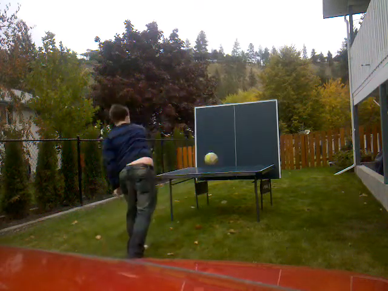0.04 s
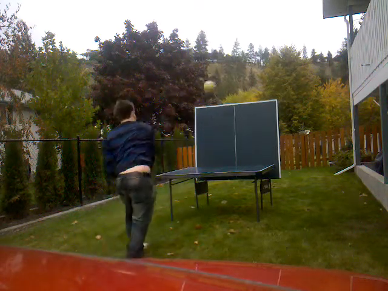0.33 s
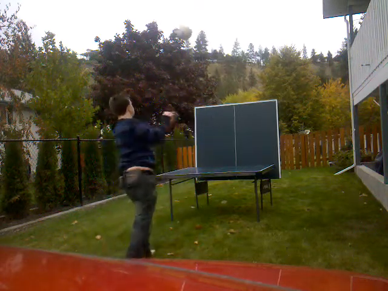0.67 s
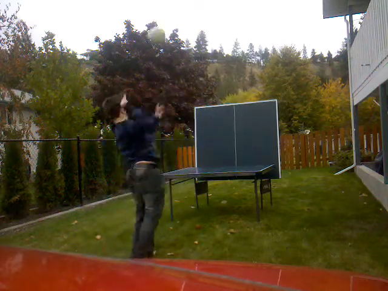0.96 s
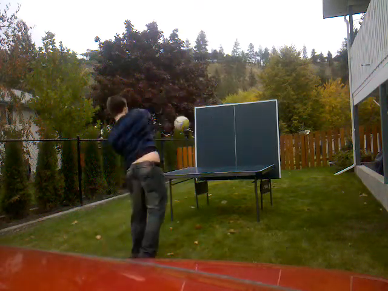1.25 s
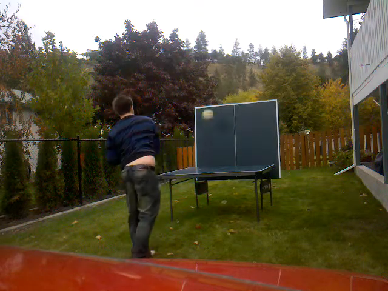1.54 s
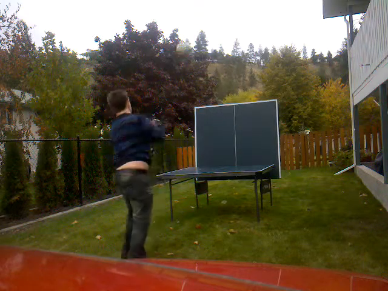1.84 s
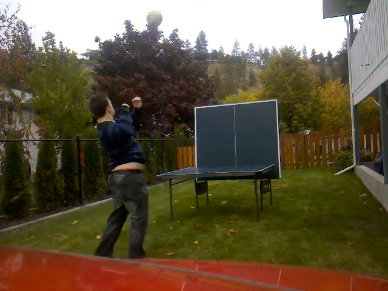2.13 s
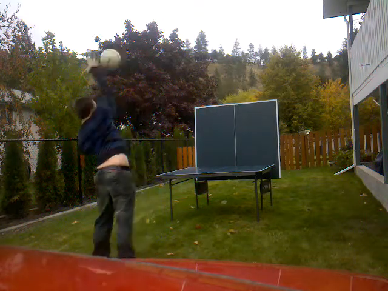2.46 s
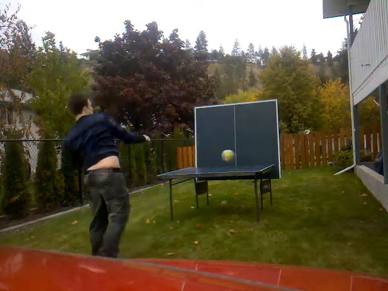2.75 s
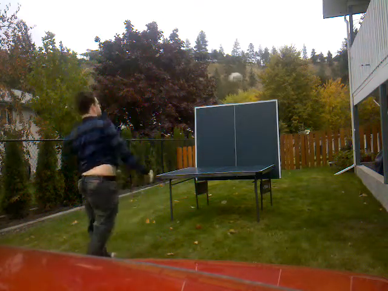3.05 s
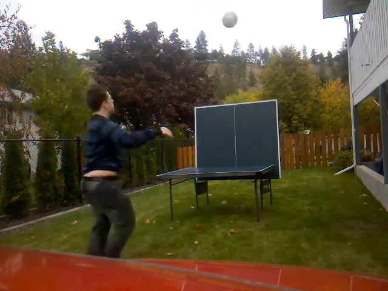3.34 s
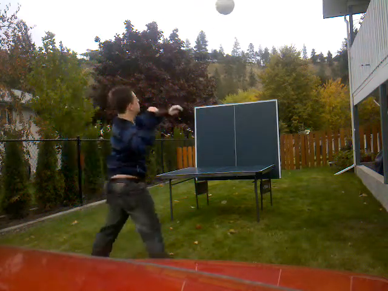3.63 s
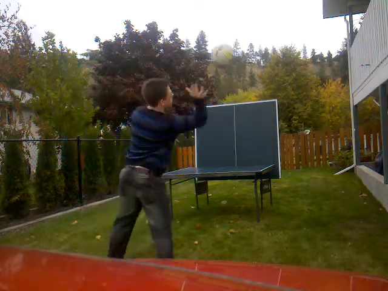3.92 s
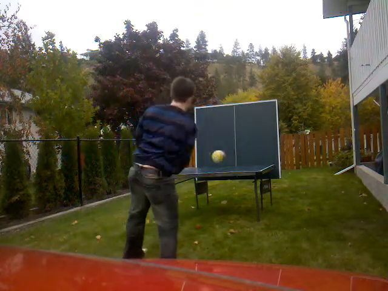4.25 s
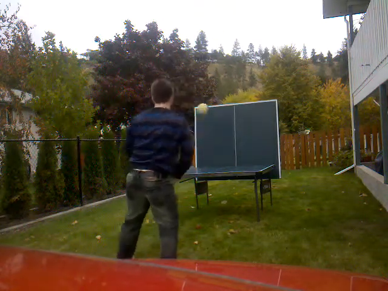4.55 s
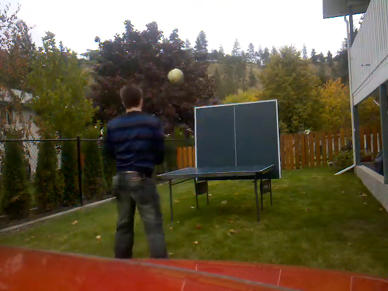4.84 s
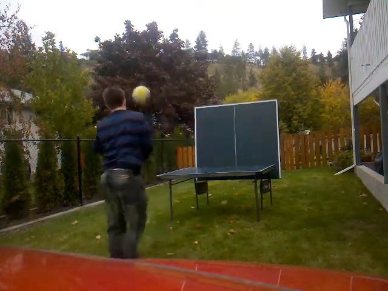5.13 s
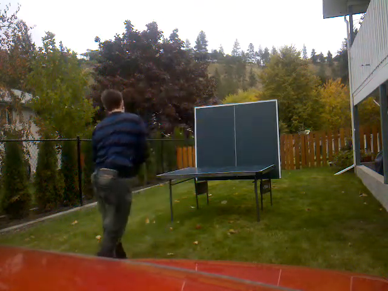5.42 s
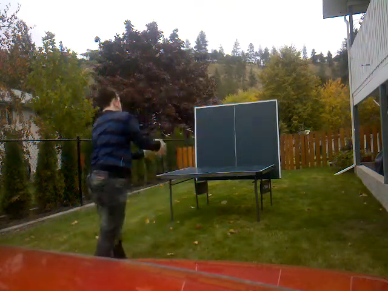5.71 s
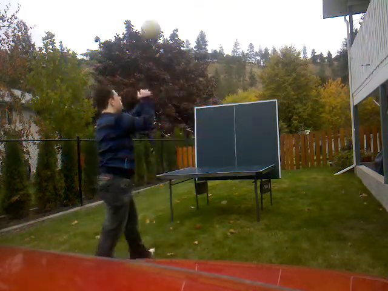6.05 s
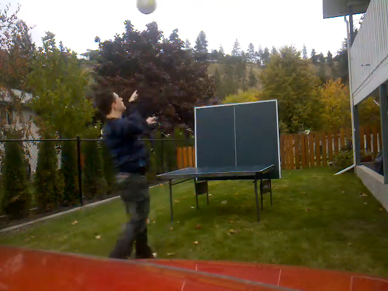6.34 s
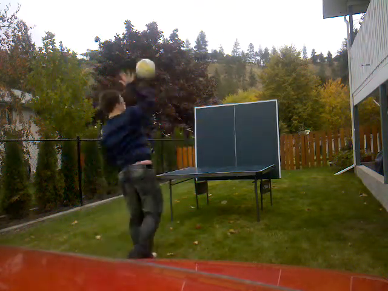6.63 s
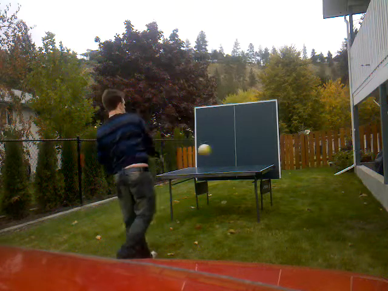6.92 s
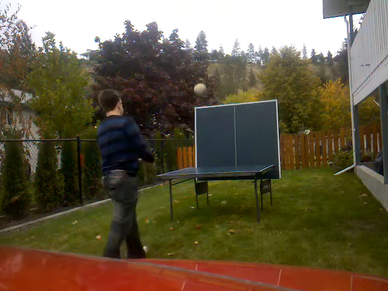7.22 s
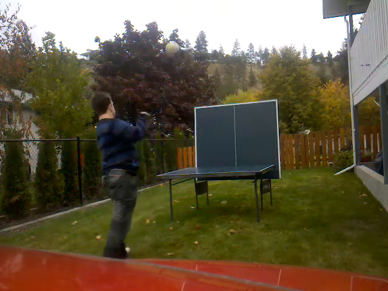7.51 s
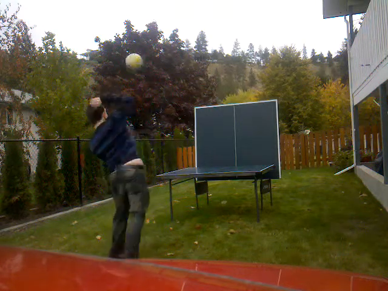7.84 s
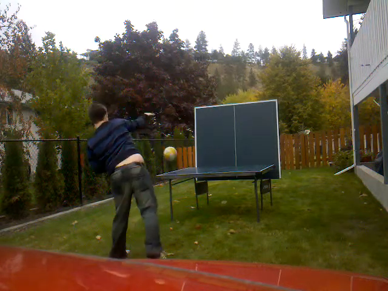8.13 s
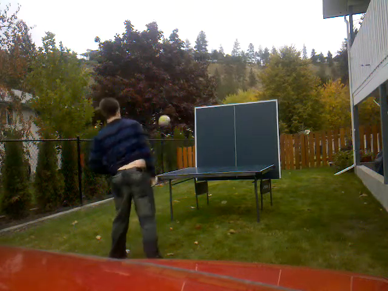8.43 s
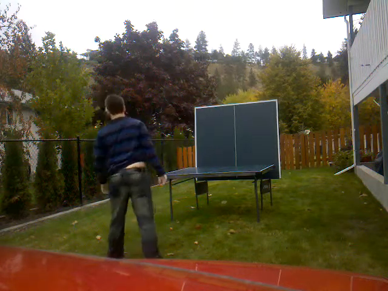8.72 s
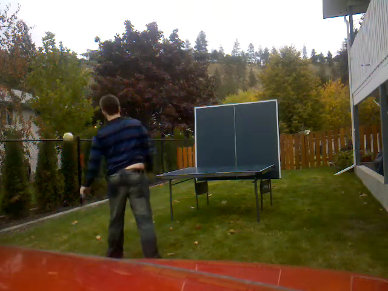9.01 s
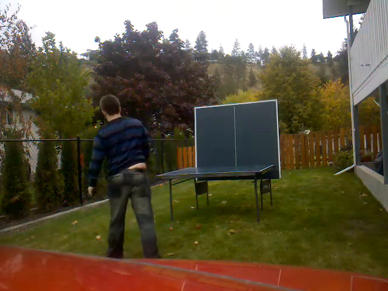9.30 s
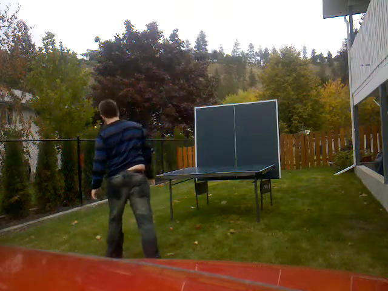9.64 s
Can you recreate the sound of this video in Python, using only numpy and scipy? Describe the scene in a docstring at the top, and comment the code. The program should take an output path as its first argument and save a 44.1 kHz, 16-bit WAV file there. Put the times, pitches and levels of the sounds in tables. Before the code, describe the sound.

In a back yard, a hand spikes a volleyball against a half-folded table-tennis table five times. Each sharp slap is followed by a hollow bang, usually double, with rattling boards and a brief echo. Midway there is a pause with soft knocks and jacket swishes. The last ball rustles into a hedge. A stationary microphone nearby also catches a faint outdoor wash and a distant engine drone.

```python
"""Over a faint outdoor wash and a distant engine drone, a volleyball bangs on a half-folded
table-tennis table in a back yard. It is spiked again and again: each slap excites the ball's skin and
the air inside, then the impact sets the loose boards booming and rattling. Walls near and far reflect
the blows. A jacket swishes by friction, the last ball ends in a hedge and a vehicle draws nearer."""
import sys
import numpy as np
from scipy import signal
from scipy.fft import rfft, irfft
from scipy.io import wavfile

SR = 44100
rng = np.random.default_rng(int(sys.argv[2]) if len(sys.argv) > 2 else 0)


def dump(signal):
    """Clip the signal to [-1, 1] and save it as 16-bit WAV at the path in sys.argv[1]."""
    limited = np.clip(np.atleast_2d(signal).T, -1, 1)
    pcm = np.round(limited * 32767).astype(np.int16)
    wavfile.write(sys.argv[1], SR, pcm)


N = 426447
T = np.arange(SR) / SR  # one second, the time axis of a single event
SCENE_T = np.arange(N) / SR


def amp(db):
    """Amplitude ratio of a level in decibels."""
    return 10 ** (np.asarray(db) / 20)

def unit(x):
    """Normalisation to an rms of 1."""
    return x / np.sqrt(np.mean(x ** 2) + 1e-20)

def read(points, hz):
    """Interpolation of a table on a logarithmic frequency axis."""
    f, value = np.transpose(points)
    return np.interp(np.log(hz + 1), np.log(f + 1), value)

def add(mix, s, sound):
    """Superposition: the sound joins the mix at s seconds."""
    part = mix[..., max(round(s * SR), 0):][..., :sound.shape[-1]]
    part += sound[..., :part.shape[-1]]

def fade(t60):
    """Exponential decay, falling 60 dB in t60 seconds."""
    return np.exp(-np.log(1000) * T / max(t60, 1e-4))

def swell(seconds):
    """A smooth onset with the given time constant."""
    return 1 - np.exp(-(T / seconds) ** 2)

def ring(hz, t60):
    """Free vibration of one damped mode."""
    return np.sin(2 * np.pi * hz * T) * fade(t60)

def noise(spectrum, size=SR):
    """Two uncorrelated noises of one spectral shape, together at rms 1."""
    gain = amp(read(spectrum, np.fft.rfftfreq(size, 1 / SR)))
    return unit(irfft(rfft(rng.standard_normal((2, size))) * gain, size))

def flutter(depth_db, rate, size=SR):
    """Random modulation: a factor that moves to a new value rate times a second."""
    steps = np.arange(size) * rate / SR
    return unit(amp(depth_db * np.interp(steps, np.arange(size), rng.standard_normal(size))))

def click(spectrum, tilt_db, size=SR):
    """A minimum-phase pulse of peak 1, its spectrum tilted by tilt_db per octave above 1.5 kHz."""
    hz = abs(np.fft.fftfreq(size, 1 / SR))
    log_gain = np.log(amp(read(spectrum, hz) + tilt_db * np.log2(np.maximum(hz / 1500, 1))))
    pulse = np.fft.ifft(np.exp(np.conj(signal.hilbert(log_gain)))).real
    return pulse / abs(pulse).max()

def low_cut(x, hz):
    """Second-order high-pass filter."""
    return signal.sosfilt(signal.butter(2, hz, "highpass", fs=SR, output="sos"), x)


# Spectra of the wash and of low rumble. Each row: frequency in Hz, relative level in dB.
WASH_SPECTRUM = [(25, -36), (65, -14.5), (110, -9.5), (200, -8), (300, -6.5), (480, -9), (900, -12.5),
                 (1600, -18), (2860, -23), (3630, -20.5), (4850, -37.5), (7000, -32.5), (10000, -29.5),
                 (14000, -34)]
RUMBLE_SPECTRUM = [(25, -41), (55, -44), (75, 11), (95, 2), (140, -40), (300, -20), (1000, -74)]
# Course of the wash. Each row: time in seconds, relative level in dB.
WASH_LEVELS = [(0, -57.5), (1.0, -60), (1.6, -56.5), (3.3, -59), (4.4, -60.5), (5.6, -56.5), (7.9, -55),
               (8.5, -51), (9.67, -50.5)]

def outdoor_wash(gain_db=4, rumble_db=-84):
    """Broadband ambient noise drifts in level above a steady rumble."""
    level = amp(gain_db + np.interp(SCENE_T, *np.transpose(WASH_LEVELS)))
    wash = level * noise(WASH_SPECTRUM, size=N) * flutter(0.12, 13, size=N)
    return wash + amp(rumble_db) * noise(RUMBLE_SPECTRUM, size=N)


# Each row: time in seconds, relative levels of the fundamental and of its octave in dB.
ENGINE_LEVELS = [(0.0, -60, -63), (0.48, -61, -56.5), (0.89, -79, -54.5), (1.37, -64, -55),
                 (2.26, -58.5, -64), (2.72, -63, -72), (3.39, -62.5, -74), (4.12, -69, -63),
                 (5.25, -56, -61.5), (5.41, -65, -68), (7.92, -66, -58), (8.24, -65, -59),
                 (8.56, -67, -53.5), (9.67, -58, -60)]

def far_engine(hz=101.8, fundamental_gain_db=4, octave_gain_db=3, third_db=-66.5):
    """A periodic source gives a harmonic series: three partials waver in pitch and level."""
    times, *columns = np.transpose(ENGINE_LEVELS)
    fundamental_db, octave_db = (np.interp(SCENE_T, times, column) for column in columns)
    levels = [fundamental_db + fundamental_gain_db, octave_db + octave_gain_db, third_db]
    phase = 2 * np.pi * np.cumsum(hz * flutter(.09, 15, size=N)) / SR
    out = np.zeros((2, N))
    for order, db in enumerate(levels, 1):
        out[0] += np.sqrt(2) * amp(db) * np.sin(order * phase) * flutter(1.8, 12, size=N)
    return out


# Chatter spectrum and modes of the metal frame. Each row: frequency in Hz, relative level in dB.
CHATTER_SPECTRUM = [(100, -22), (600, -16), (1000, -6.5), (1500, -1), (1850, -4), (2060, 1), (2300, -1.5),
                    (2700, -6.5), (3300, -16), (6000, -31.5), (8000, -27.5), (10000, -23), (14000, -29)]
FRAME_MODES = [(1520, -17), (1630, -17), (1793, -15), (1960, -16), (2045, -13), (2120, -16)]

def rattle(t60):
    """Repeated contact of loose boards makes grainy noise; each blow excites the frame differently."""
    chatter = noise(CHATTER_SPECTRUM) * flutter(3.2, 300)
    frame = sum(amp(db) * rng.standard_normal((2, 1)) * np.sin(2 * np.pi * (hz * T + rng.random()))
                for hz, db in FRAME_MODES)
    return (chatter + frame) * fade(t60)


# Spectra of the impact and of its reflections. Each row: frequency in Hz, relative level in dB.
BANG_SPECTRUM = [(50, -20), (170, -2), (420, -10), (900, 0.5), (1500, 4.5), (2300, 0), (3300, -8),
                 (6500, -25), (10000, -16), (14000, -36)]
BOOM_SPECTRUM = [(40, -33), (75, -29), (110, 7), (175, -4), (260, 3.5), (400, 3), (700, -4.5), (1300, -9.5),
                 (4000, -16.5), (14000, -48)]
CLATTER_SPECTRUM = [(500, -30), (1300, -26), (1750, 13), (2300, 9), (2900, -20), (5000, -23), (14000, -40)]
ECHO_SPECTRUM = [(200, -23), (900, -3.5), (1900, 0.5), (2900, 2), (3500, -7.5), (4300, -8), (6000, -26),
                 (10000, -14.5), (14000, -24)]
LEAF_SPECTRUM = [(880, -28), (1500, -16), (2040, -15), (2260, -11), (3380, -8.5), (6750, -19.5),
                 (8220, -12), (9280, -4), (10700, -5), (14000, -16)]
# Bending modes of the boards. Each row: frequency in Hz, relative level in dB, t60 in seconds.
BOARD_MODES = [(96.3, -7, 0.23), (159.4, -11.5, 0.45)]
# Each row: start in seconds, crack level in dB, treble tilt in dB per octave, rattle level in dB,
# rattle t60 in seconds, boom level in dB, delay until the loose half swings back in seconds.
TABLE_IMPACTS = [(0.0752, -5, 2, -24, 0.4, -31, 0.034), (0.2072, -12, -0.5, -36, 0.62, -30, 0.032),
                 (1.4144, -11.5, -5, -27, 0.36, -34.5, 0.035), (1.508, -17.5, -25, -33, 0.47, -28, 0.04),
                 (2.7739, -13, -2.5, -26.5, 0.25, -36, .03), (2.8914, -14, -1, -36.5, 0.5, -34.5, 0.014),
                 (4.322, -23.5, 0, -38, 0.57, -41.5, .026), (4.4116, -17, 1, -37.5, 0.46, -33, 0.041),
                 (6.9517, -8, 1.5, -27, 0.51, -32, 0.022), (7.1450, -8.5, -2, -33.5, 0.44, -31, 0.018),
                 (8.2493, -11, -0.5, -30, 0.52, -34.5, 0)]

def table_bangs(bounce_db=-11, near_db=-24, near_delay_s=0.016, far_db=-17, far_delay_s=.47):
    """Impact excitation: the ball cracks on a board, which booms in its modes and beats on its frame."""
    direct, scattered = np.zeros(N), np.zeros((2, N))
    for s, crack_db, tilt_db, rattle_db, t60, boom_db, swing_s in TABLE_IMPACTS:
        crack = amp(crack_db) * click(BANG_SPECTRUM, tilt_db)
        flex = sum(amp(db) * ring(hz, decay) for hz, db, decay in BOARD_MODES) * swell(0.0079)
        air_push = amp(15) * ring(hz=179, t60=0.023) * swell(0.0014)
        add(direct, s, crack + amp(boom_db) * (air_push + flex))
        add(direct, s + rng.uniform(0.00372, .008), amp(bounce_db) * crack)
        chatter = rattle(t60) * (.4 + .75 * swell(.03))  # builds as the loose edges start to swing
        boom = noise(BOOM_SPECTRUM) * fade(0.46) * swell(0.004)
        add(scattered, s, amp(rattle_db) * chatter + amp(boom_db) * boom)
        clatter = noise(CLATTER_SPECTRUM) * swell(0.0036) * fade(0.21) * flutter(2.5, 360)
        add(scattered, s + swing_s, amp(rattle_db - 1.5) * clatter)
        # Echo delay grows with path length: wall and foliage answer first, distant houses later.
        wall = amp(crack_db + near_db) * noise(ECHO_SPECTRUM) * fade(0.013)
        foliage = amp(boom_db - 13) * noise(LEAF_SPECTRUM) * fade(0.38) * flutter(5.1, 300)
        add(scattered, s + near_delay_s, wall + foliage)
        houses = noise(ECHO_SPECTRUM) * swell(0.085) * fade(0.48) * flutter(2.5, 150)
        add(scattered, s + far_delay_s, amp((rattle_db + crack_db) / 2 + far_db) * houses)
    return direct, scattered


# Each row: start in seconds, level in dB, centre frequency in Hz, t60 in seconds.
SOFT_IMPACTS = [(.402, -39.5, 1970, 0.088), (5.359, -47.5, 348, 0.13), (5.532, -39.5, 1210, 0.068),
                (5.570, -40.5, 397, 0.058), (8.382, -33, 940, 0.31), (8.559, -40.5, 2080, 0.094),
                (9.658, -37, 178, 0.052)]

def knocks():
    """Damped impacts of ball, hands and feet each give a broad, decaying band of noise."""
    out = np.zeros((2, N))
    for s, db, hz, t60 in SOFT_IMPACTS:
        band = [(hz / 8, -22), (hz / 2, -5), (hz, 0), (hz * 1.47, -5), (hz * 3, -22), (hz * 10, -36)]
        add(out, s, amp(db) * 1.06 * noise(band) * fade(t60) * swell(0.00017))
    return out


# Spectra of the hand's crack, the snap of skin, the flutter of the ball's cover and the yard's
# reverberation. Each row: frequency in Hz, relative level in dB.
SLAP_SPECTRUM = [(60, -24.5), (140, -5.5), (330, 6.5), (500, 10), (800, -0.5), (1400, 4.5), (2300, -4),
                 (3200, -11.5), (5500, -19), (8000, -19), (10500, -23), (14000, -35.5)]
SNAP_SPECTRUM = [(1000, -20), (2700, 12), (4000, 9), (5400, -22), (8000, -7), (10000, -0.5), (12000, 1),
                 (14000, -28)]
COVER_SPECTRUM = [(100, -17), (250, 11), (380, -5.5), (800, 3), (1400, -6.5), (2300, -7.5), (3300, -33),
                  (14000, -62)]
YARD_SPECTRUM = [(40, -38), (110, 4), (200, 4.5), (500, -6.5), (900, -7.5), (1600, -14.5), (3000, -12.5),
                 (6000, -31), (10000, -25), (14000, -33)]
# Air resonances inside the ball. Each row: frequency in Hz, relative level in dB, t60 in seconds.
CAVITY_MODES = [(350, -12, .025), (495, -18, .06), (1060, -31, .025), (1450, -28, .025)]
# Each row: start in seconds, palm level in dB, thump level in dB, treble tilt in dB per octave,
# pop frequency in Hz, pop level in dB, near echo delay in seconds, near echo gain in dB.
HAND_IMPACTS = [(1.1577, -10.5, -7.5, -5.5, 1370, -23, 0.024, -6.5),
                (2.5078, -4, -8, 1, 1950, -4.5, 0.02, -14.5), (3.9593, -5, -8.5, 0, 2430, -6.5, 0.027, -25),
                (6.7345, -10, -9, 2, 1450, -13.5, 0.018, -10.5),
                (8.0384, -9.5, -9.5, 2.4, 1380, -14, 0.016, -7.5)]

def slaps(thump_hz=200, ground_db=-24, scatter_db=-19, tail_db=-30, wall_db=-37, wall_delay_s=0.059):
    """Membrane and cavity resonance: the hand cracks on the ball, its skin thumps, its air rings."""
    direct, scattered = np.zeros(N), np.zeros((2, N))
    cavity = sum(amp(db) * ring(hz, t60) for hz, db, t60 in CAVITY_MODES)
    thump = -1.25 * ring(thump_hz, t60=.03) * swell(.0022)
    for s, palm_db, thump_db, tilt_db, pop_hz, pop_db, near_delay_s, near_db in HAND_IMPACTS:
        contact = amp(palm_db) * .1 * rng.standard_normal(SR) * fade(.012)
        contact[0] = amp(palm_db)
        add(contact, 0.00128, amp([palm_db - 16]))  # the fingers land just after the palm
        crack = signal.fftconvolve(contact, click(SLAP_SPECTRUM, tilt_db))[:SR]
        pop = amp(pop_db) * ring(pop_hz, t60=0.0062)  # air squeezed from under the cupped hand
        snap = amp(palm_db + 1.44 * tilt_db - 8.5) * noise(SNAP_SPECTRUM)[0] * fade(0.0076)
        cover = amp(palm_db - 15) * noise(COVER_SPECTRUM)[0] * fade(0.061) * swell(0.0021)
        blow = crack + pop + snap + cover + amp(thump_db) * (thump + cavity)
        add(direct, s, blow)
        add(direct, s + 0.0022, amp(ground_db) * blow)
        # The near echo is thinner and carries a hollow knock.
        hollow = amp(thump_db - 5) * ring(hz=544, t60=0.018)
        add(direct, s + near_delay_s, amp(near_db) * (low_cut(blow, hz=373) + hollow))
        level_db = (palm_db + thump_db) / 2
        yard_decay = amp(scatter_db) * fade(0.15) + amp(tail_db) * fade(0.45)
        yard = noise(YARD_SPECTRUM) * yard_decay * swell(0.021) * flutter(3, 400)
        add(scattered, s, amp(level_db) * yard)
        # A wall some way off returns a smeared, bright echo; foliage scatters the treble.
        wall = noise(ECHO_SPECTRUM) * (fade(0.3) + 1.9 * fade(0.01))
        add(scattered, s + wall_delay_s, amp(palm_db + wall_db) * wall)
        foliage = noise(LEAF_SPECTRUM) * fade(0.25)
        add(scattered, s + near_delay_s, amp(level_db + 2 * tilt_db - 40) * foliage)
    return direct, scattered


# Each row: frequency in Hz, relative level in dB.
HISS_SPECTRUM = [(5000, -53), (6600, -17), (7300, -1), (7900, -36), (10000, -45)]

def faint_hiss(start_s=3.1, length_s=2.6, db=-82):
    """Narrow-band noise near 7 kHz is heard as a thin hiss that comes and goes."""
    out = np.zeros((2, N))
    size = round(length_s * SR)
    add(out, start_s, amp(db) * noise(HISS_SPECTRUM, size) * signal.windows.tukey(size, .2))
    return out


# Rubbing cloth. Each row: frequency in Hz, relative level in dB.
CLOTH_SPECTRUM = [(88, -55), (150, -9), (297, -4), (515, -3.5), (588, -3), (828, -1.5), (1080, 1),
                  (2020, -11.5), (3850, -8.5), (5520, -26), (6680, -11.5), (9400, -16), (14000, -78)]
# Each row: peak time, rise time and fall time in seconds, swish level and fizz level in dB.
SLEEVE_STROKES = [(5.55, .17, 0.2, -50.5, -57), (5.94, 0.1, 0.15, -42, -47),
                  (6.418, 0.046, 0.12, -50.5, -53), (9.0, 0.14, 0.31, -49, -56),
                  (9.48, 0.063, 0.084, -46.5, -46)]

def jacket(edge_db=-13):
    """Friction noise: sleeves rub on the body, each stroke swelling and dying in a bell shape."""
    out = np.zeros((2, N))
    from_peak = T - .5
    for s, rise, fall, swish_db, fizz_db in SLEEVE_STROKES:
        stroke = amp(edge_db * (from_peak / np.where(from_peak < 0, rise, fall)) ** 2)
        rub = amp(swish_db) * noise(CLOTH_SPECTRUM) + amp(fizz_db) * noise(LEAF_SPECTRUM)
        add(out, s + from_peak[0], rub * stroke * flutter(1.5, 205))
    return out


# Each row: start in seconds, level in dB, t60 in seconds.
BRUSH_CONTACTS = [(5.443, -44.5, 0.1), (8.106, -22, 0.012), (9.076, -35, 0.37), (9.105, -40, 0.48),
                  (9.257, -42, .03)]

def brushes():
    """Brief friction on cloth and leaves gives crisp, grainy bursts of noise."""
    out = np.zeros((2, N))
    for s, db, t60 in BRUSH_CONTACTS:
        add(out, s, amp(db) * noise(LEAF_SPECTRUM) * fade(t60) * swell(0.00021) * flutter(4, 380))
    return out


# Each row: time in seconds, firing rate in Hz.
FIRING_RATES = [(5.9, 97), (6.4, 78), (7.3, 76), (8.3, 81.7), (9.67, 84.7)]

def vehicle(start_s=6.6, fade_in_s=.3, growth_db_per_s=6, tone_db=-71.5, rumble_db=-78.5):
    """Exhaust pitch follows the firing rate; tone and rumble grow louder as the distance shrinks."""
    elapsed = SCENE_T - start_s
    nearness = np.clip(elapsed / fade_in_s, 0, 1) * amp(growth_db_per_s * elapsed)
    phase = 2 * np.pi * np.cumsum(np.interp(SCENE_T, *np.transpose(FIRING_RATES))) / SR
    out = amp(rumble_db) * noise(RUMBLE_SPECTRUM, size=N)
    out[0] += amp(tone_db) * np.sqrt(2) * np.sin(phase) * flutter(2.0, 7.9, size=N)
    return out * nearness


# Each row: frequency in Hz, phase lead of the left port in radians.
LEFT_PHASE_LEAD = [(80, 2.4), (250, 1.4), (500, .7), (900, 0), (1500, -.5), (2000, -.1), (2800, 1.4),
                   (3500, 3), (5000, 5.2), (6400, 7.5), (8500, 3.1), (11200, -3.1), (14000, -9)]
# Each row: frequency in Hz, left level minus right level in dB.
LEVEL_DIFFERENCE = [(120, 1), (300, 3.5), (520, 5), (1000, 2), (1600, -1), (2400, -3.6), (3800, .5),
                    (14000, -.5)]
# Each row: frequency in Hz, coherence of scattered sound between the ports from 0 to 1.
COHERENCE = [(100, 1), (300, 0.92), (800, 0.57), (1600, 1), (2300, 0.25), (3100, 0.83), (5000, 0.028),
             (14000, 0.27)]

def microphone_ports(direct, scattered, side_db=3):
    """Two ports differ in level and phase; scattered sound is only partly coherent between them."""
    hz = np.fft.rfftfreq(N, 1 / SR)
    shared = rfft(low_cut(direct, hz=83))
    diffuse_left, independent = rfft(scattered)
    coherence = np.clip(read(COHERENCE, hz), 0, 1)
    diffuse_right = coherence * diffuse_left + np.sqrt(1 - coherence ** 2) * independent
    balance = amp(read(LEVEL_DIFFERENCE, hz) / 2)
    # The direct sound's low mids are stronger on the left.
    side = amp(side_db / 2 * read([(100, 0), (250, 1), (1000, 1), (1800, 0)], hz))
    left = shared * side + diffuse_left
    right = (shared / side + diffuse_right) * np.exp(-1j * read(LEFT_PHASE_LEAD, hz))
    return irfft(np.array([left * balance, right / balance]), N)


def scene():
    """Direct and scattered sound from all sources superpose at the microphone."""
    background = outdoor_wash() + far_engine()
    boards, boards_scattered = table_bangs()
    hand, hand_scattered = slaps()
    surroundings = background + knocks() + faint_hiss() + jacket() + brushes() + vehicle()
    return microphone_ports(boards + hand, boards_scattered + hand_scattered + surroundings)

def record(dry, cutoff_hz=14000):
    """Clipping at full scale, then band limiting by a low-pass filter."""
    lowpass = signal.firwin(301, cutoff_hz, window=("kaiser", 8), fs=SR)
    return signal.oaconvolve(np.clip(dry, -1, 1), lowpass[None], "same")


dry = scene()
out = record(dry)
dump(out)
```